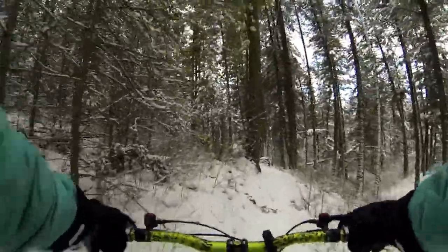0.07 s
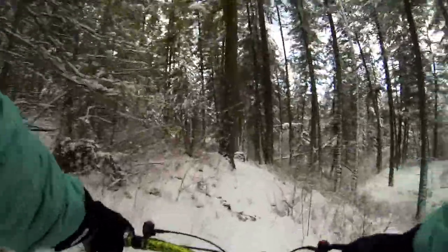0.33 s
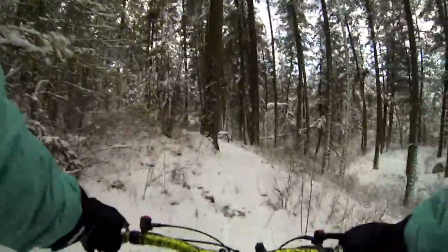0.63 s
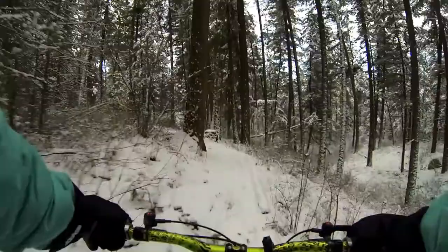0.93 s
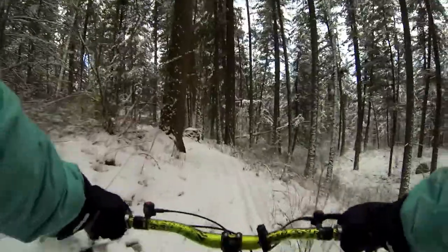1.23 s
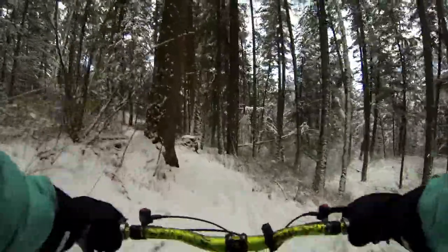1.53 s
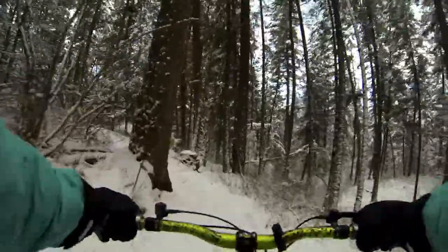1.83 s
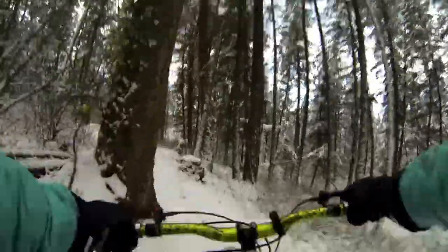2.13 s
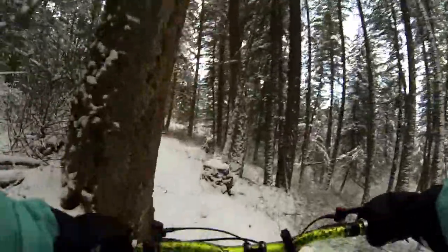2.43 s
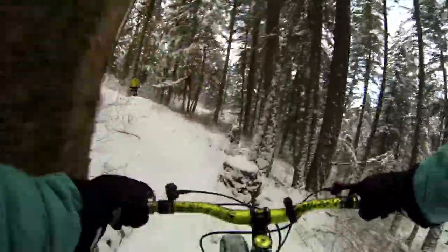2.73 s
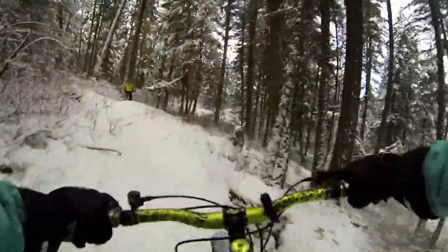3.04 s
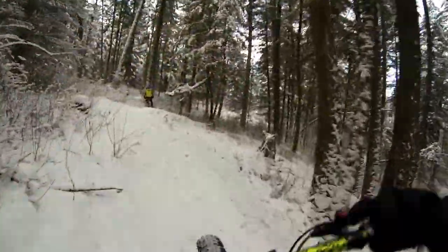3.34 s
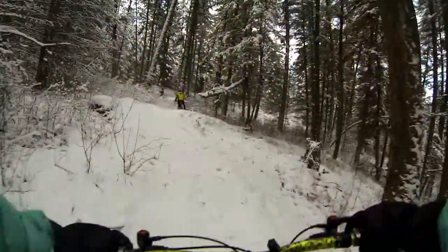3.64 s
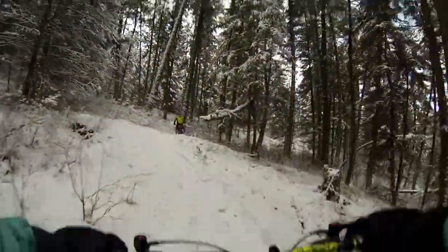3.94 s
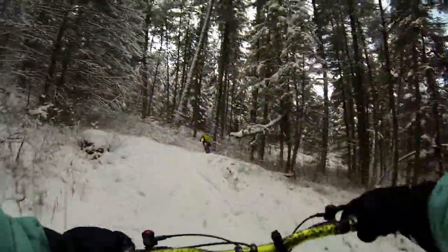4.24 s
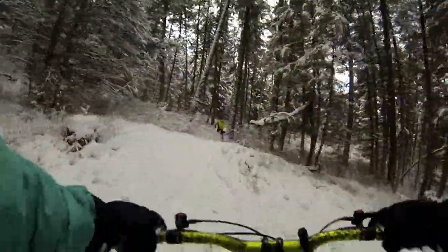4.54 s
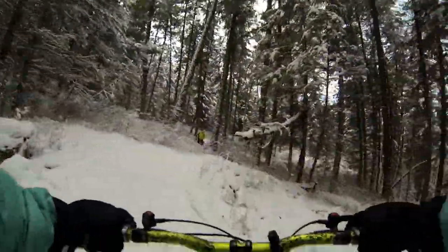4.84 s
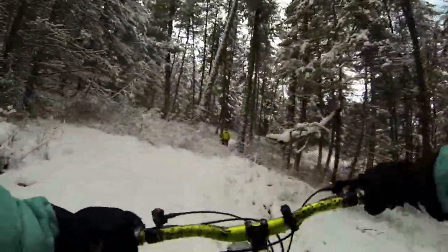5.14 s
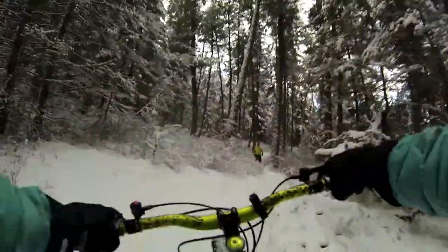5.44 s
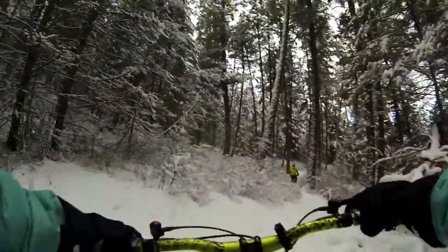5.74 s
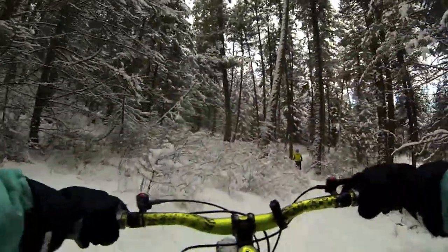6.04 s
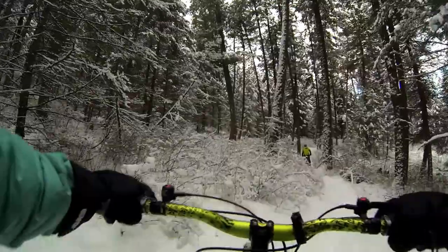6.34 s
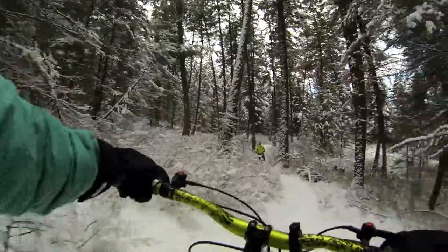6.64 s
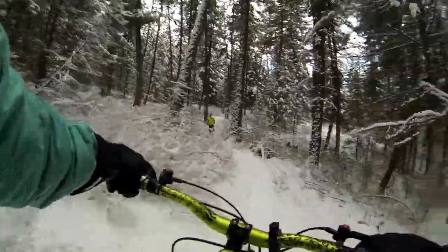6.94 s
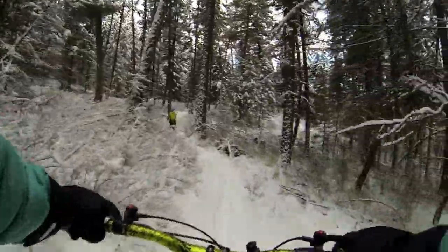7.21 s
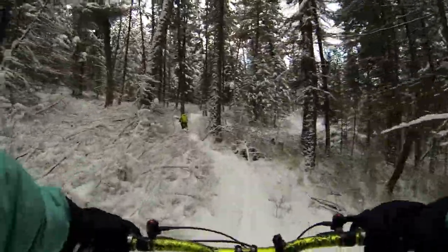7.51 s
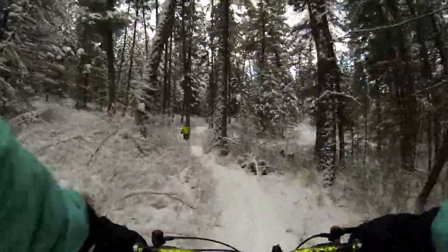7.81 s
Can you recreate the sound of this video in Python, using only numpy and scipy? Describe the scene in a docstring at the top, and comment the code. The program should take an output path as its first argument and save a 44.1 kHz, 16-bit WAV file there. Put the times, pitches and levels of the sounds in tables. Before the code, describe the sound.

Loud, irregular clacks of a knocked camera case and rustling cloth sit over bicycle tyres crunching through snow.

```python
"""A snowy forest trail, heard from a cased camera on the chest of a mountain biker rolling down it.
The tyres crunch and crackle over packed snow, and the rough ground shakes the camera into a rumble.
A warped brake disc brushes its pad and squeaks faintly; near the end loose snow hisses up.
The jacket rubs and creaks on the case, and bumps knock the case in its mount, so hard that
the recorder ducks and clips."""
import sys
import numpy as np
from scipy import signal
from scipy.fft import rfft, irfft, next_fast_len
from scipy.io import wavfile
from scipy.ndimage import uniform_filter1d, minimum_filter1d, map_coordinates

SR = 44100
rng = np.random.default_rng(int(sys.argv[2]) if len(sys.argv) > 2 else 0)


def digitize_waveform(pressure):
    """Quantize a signal to 16-bit integers and store it at the path in sys.argv[1].

    Rows of a 2-D input are taken as channels; values are limited to [-1, 1].
    """
    field = np.atleast_2d(pressure).T
    bounded = np.clip(field, -1, 1)
    quanta = np.round(bounded * 32767).astype(np.int16)
    wavfile.write(sys.argv[1], SR, quanta)


N = 347067

# how hard the tyres work the snow: (time [s], level [dB])
TYRE_EFFORT = [(0.0, -38), (0.4, -41), (0.5, -33), (0.7, -39.5), (0.8, -31.5), (1.15, -38.5), (1.6, -33),
               (1.8, -35.5), (2.4, -35), (2.7, -34.5), (3.0, -33.5), (3.1, -41), (3.25, -35), (3.7, -39.5),
               (3.9, -39.5), (4.7, -39.5), (4.95, -44), (5.4, -37.5), (5.9, -40), (6.35, -34), (6.65, -39),
               (6.8, -40.5), (7.0, -31), (7.28, -32), (7.5, -34), (7.65, -34), (7.86, -41)]
# depth of the snow under the tyres: (time [s], softness [0-1])
SNOW_SOFTNESS = [(0, 0.29), (2.9, 0.19), (3.55, 0.04), (4.2, 0.07), (5.7, 0.16), (6.25, 0.53), (6.7, 0.14),
                 (7.0, 0.48), (7.45, 0.51), (7.87, 0)]
# tone of crunching snow: (frequency [Hz], level [dB])
SNOW_TONE = [(25, -14), (60, -14), (130, -9.5), (300, -11), (580, 0), (950, 2), (1250, -10.5), (2500, -8),
             (4500, -21.5), (7000, -26), (10000, -34.5), (15000, -60)]


def amp(db):
    """Decibels to gain."""
    return 10 ** (np.asarray(db) / 20)


def unit(x):
    """x at rms 1."""
    return x / np.sqrt(np.mean(x ** 2) + 1e-20)


def curves(rows):
    """One value per sample for each column after the time."""
    s, *cols = np.transpose(rows)
    return [np.interp(np.arange(N) / SR, s, c) for c in cols]


def wobble(rate):
    """A smooth random curve, rate knots a second."""
    return map_coordinates(rng.standard_normal(int(N * rate / SR) + 4), [np.arange(N) * rate / SR])


def filtered(x, response):
    """x times a response of frequency."""
    m = next_fast_len(len(x) + 8192)
    return irfft(rfft(x, m) * response(np.fft.rfftfreq(m, 1 / SR)), m)[:len(x)]


def shape(points):
    """Gain as a function of frequency, from (Hz, dB) points."""
    f, db = np.transpose(points)
    return lambda hz: amp(np.interp(np.log(hz + 1), np.log(f), db))


def coloured(x, points):
    """x shaped by a spectrum, at rms 1."""
    return unit(filtered(x, shape(points)))


def sparks(rate, spread_db):
    """Random impulses, rate a second, of uneven size."""
    return (rng.random(N) < rate / SR) * amp(spread_db * np.clip(rng.standard_normal(N), -2, 2))


def add(track, s, sound):
    """Mix a sound into the track from time s."""
    room = track[max(round(s * SR), 0):][:len(sound)]
    room += sound[:len(room)]


def ringing_mode(hz, centre, width):
    """The band-pass response of one resonance."""
    return 1j * hz * width / (centre ** 2 - hz ** 2 + 1j * hz * width)


def swell(s, length):
    """A bell curve of power around time s."""
    return np.exp(-np.minimum((2 * (np.arange(N) / SR - s) / length) ** 2, 50))


def patchy(x, depth_db):
    """x at rms 1, its colour shifting in patches some 300 Hz wide and 10 ms long."""
    spectra = signal.stft(x, nperseg=512, noverlap=384)[2]
    patches = uniform_filter1d(rng.standard_normal(spectra.shape), size=4, axis=0)
    patches = uniform_filter1d(patches, size=4, axis=1)
    spectra *= amp(depth_db * np.clip(unit(patches), -2, 2))
    return unit(signal.istft(spectra, nperseg=512, noverlap=384)[1][:N])


def collapse(pitch_hz):
    """A pocket of snow gives way in a single pressure swing, within 8 ms."""
    phase = np.pi * pitch_hz * (np.arange(round(.008 * SR)) / SR - .004)
    return (1 - 2 * phase ** 2) * np.exp(-phase ** 2)


def crunch(pitch_hz, rate):
    """Snow pockets of three sizes collapse, each size rate times a second, a few much louder."""
    pitches = pitch_hz * 2 ** np.array([-.5, 0, .5])
    layers = [signal.fftconvolve(sparks(rate, spread_db=4), collapse(hz), "same") for hz in pitches]
    return unit(sum(layers))


def tread(rate, scatter, spread_db=3, pitch_hz=430):
    """The knobs bite into soft snow one after another, uneven in time and strength."""
    knobs = np.arange(int(N / SR * rate))
    onsets = (knobs + scatter * rng.standard_normal(len(knobs))) * SR / rate
    strengths = amp(spread_db * np.clip(rng.standard_normal(len(knobs)), -2, 2))
    bites = np.bincount(np.clip(onsets, 0, N - 1).astype(int), strengths, N)
    return unit(signal.fftconvolve(bites, collapse(pitch_hz), "same"))


def tyres(bed_db=-2.5, firm_db=-5, soft_db=-10, tread_db=1.5, uneven_db=2.5):
    """Snow packs under the knobs: a fine crunch where firm, a deep purr where soft, a few big lumps."""
    # lumps of snow collapsing under a tyre: (time [s], peak [dB], pitch [Hz])
    lumps = [(0.297, -17.5, 620), (0.784, -12.5, 564), (0.801, -18, 560), (0.867, -19.5, 523),
             (1.121, -10, 560), (1.5, -18, 566), (1.561, -13, 556), (1.7, -15, 527), (1.712, -12.5, 540),
             (2.556, -17, 564), (2.619, -10.5, 550), (2.811, -18, 517), (2.946, -23, 440),
             (5.675, -17.5, 480), (5.772, -14.5, 506), (6.236, -21, 460), (6.343, -15.5, 464),
             (7.028, -20, 480), (7.059, -15.5, 443), (7.159, -25, 480), (7.191, -18, 440),
             (7.236, -18, 480), (7.393, -15, 460), (7.403, -16, 500), (7.421, -17, 470),
             (7.468, -20.5, 480)]
    softness = np.clip(curves(SNOW_SOFTNESS)[0], 0, 1)
    firmness = np.sqrt(np.maximum(1 - 1.6 * softness, 0))
    bed = coloured(rng.standard_normal(N) * amp(2.66 * wobble(150)), SNOW_TONE)
    grit = amp(bed_db) * bed + amp(firm_db) * crunch(pitch_hz=610, rate=110)
    purr = amp(soft_db) * crunch(pitch_hz=450, rate=97) + amp(tread_db) * tread(rate=90, scatter=0.158)
    effort = amp(curves(TYRE_EFFORT)[0] + uneven_db * wobble(22))
    out = effort * (firmness * grit + softness * purr)
    for s, db, hz in lumps:
        add(out, s, amp(db) * collapse(hz))
    return out


def crackle(trim_db=-15):
    """Crystals snap under the tyres in a fine crackle, mostly where the snow is deep."""
    # tone of snapping crystals: (frequency [Hz], level [dB])
    crystal_tone = [(800, -10), (2500, 5), (4500, 1), (6000, -11), (8000, -15), (10000, -16), (12000, -29),
                    (16000, -38)]
    snaps = sparks(rate=220, spread_db=5.5) * rng.choice([-1, 1], N)
    envelope = curves(SNOW_SOFTNESS)[0] * amp(curves(TYRE_EFFORT)[0] + trim_db)
    return envelope * patchy(coloured(snaps, crystal_tone), depth_db=8)


def rumble(trim_db=-1, uneven_db=2.5):
    """The bumps of the trail reach the camera as a low, uneven rumble."""
    # how hard the trail shakes the camera: (time [s], level [dB])
    shake = [(0, -53), (0.4, -54), (0.9, -51), (1.3, -51.5), (2.4, -54), (3.0, -48.5), (3.45, -49),
             (3.65, -61), (4.1, -58), (4.45, -51.5), (5.3, -50), (5.9, -54), (6.5, -55), (7.86, -58)]
    # tone of the shaking: (frequency [Hz], level [dB])
    shake_tone = [(15, 1.5), (35, -1.5), (80, -3), (140, -9), (300, -27), (1000, -73)]
    envelope = amp(curves(shake)[0] + trim_db + uneven_db * wobble(14))
    return envelope * coloured(rng.standard_normal(N), shake_tone)


def disc_drag(trim_db=-6, sizzle_db=-14, uneven_db=4):
    """The warped disc brushes the pad once a turn and rings unevenly; in between it sizzles faintly."""
    # the front wheel and its dragging brake: (time [s], speed [turns/s], brush level [dB])
    wheel = [(0, 3.2, -73), (1.7, 3.08, -47), (2.7, 3.08, -43.5), (4.0, 3.1, -43.5), (4.95, 2.8, -51),
             (5.5, 3.4, -47), (6.2, 9.1, -51), (7.87, 2.2, -64)]
    # resonances of the brake disc: (frequency [Hz], width [Hz], level [dB])
    disc_modes = [(2170, 35, -4), (3560, 76, -24), (4665, 69, -22), (6300, 140, -33), (7440, 90, -31),
                  (7800, 73, -33), (12200, 150, -41), (13700, 200, -42)]
    warp_turn, brush_turns = 0.24, 0.6  # where in a turn the warp meets the pad, and for how much of it
    speed, brush_db = curves(wheel)
    from_warp = (np.cumsum(speed) / SR - warp_turn + .5) % 1 - .5
    contact = np.exp(-2 * (from_warp / brush_turns) ** 2) + amp(sizzle_db)
    friction, ring = rng.standard_normal(N), np.zeros(N)
    for centre, width, db in disc_modes:
        mode = filtered(friction, lambda hz: ringing_mode(hz, centre, width))
        ring += amp(db + uneven_db * wobble(22)) * mode
    return contact * amp(brush_db + trim_db) * unit(ring)


def case(hz, ring_hz, upper_db=0, wall_db=0, damping=0.62, miss_db_per_hz=0.012):
    """The case's response: an off-centre hit detunes and damps the main mode and misses the wall mode."""
    # resonances of the case, the low wall mode first: (frequency [Hz], width [Hz], level [dB])
    case_modes = [(762, 600, 7.5), (1500, 120, 3), (1700, 203, 16), (2399, 316, 11.5), (2720, 133, 2),
                  (3540, 380, -7), (4540, 720, -8), (7950, 450, -46)]
    (wall_hz, wall_width, wall_level), *higher = case_modes
    main_hz = max(higher, key=lambda mode: mode[2])[0]
    detune = abs(ring_hz - main_hz)
    modes = [(ring_hz, width + damping * detune, db) if centre == main_hz
             else (centre, width, db + upper_db * (centre > main_hz)) for centre, width, db in higher]
    modes.append((wall_hz, wall_width, wall_level + wall_db - miss_db_per_hz * detune))
    return sum(amp(db) * ringing_mode(hz, centre, width) for centre, width, db in modes)


def jacket(rustle_db=-4.5, hiss_db=-4.5, tick_db=-10, fidget_db=2.5, cutoff_hz=2900):
    """Cloth slides over the case: it hisses, tiny catches ring the case and creases tick."""
    # hard strokes of the jacket: (middle [s], length [s], level [dB])
    strokes = [(0.195, 0.036, -20.5), (0.283, 0.037, -27), (0.602, 0.018, -34), (0.756, 0.056, -31.5),
               (0.833, 0.037, -19), (0.915, 0.011, -20.5), (1.23, 0.029, -25), (1.304, 0.021, -30),
               (1.406, 0.017, -19), (1.555, 0.031, -30), (1.742, 0.03, -21), (1.948, 0.012, -20.5),
               (2.146, 0.012, -33), (2.188, 0.018, -26), (2.311, 0.031, -23.5), (2.474, 0.028, -25),
               (2.543, 0.038, -29.5), (2.661, 0.028, -25), (2.767, 0.16, -30), (3.08, 0.029, -25),
               (3.271, 0.029, -28), (3.472, 0.018, -29), (4.152, 0.031, -29.5), (4.27, 0.09, -36.5),
               (4.413, 0.041, -21.5), (4.53, 0.032, -28), (4.609, .024, -36.5), (4.867, 0.043, -35),
               (5.051, 0.024, -34.5), (5.084, 0.019, -26.5), (5.199, 0.033, -36), (5.305, 0.02, -33),
               (5.433, 0.07, -28.5), (5.793, 0.032, -30), (5.984, 0.02, -19), (6.399, 0.018, -25),
               (6.492, 0.023, -24.5), (6.601, 0.011, -29), (6.869, 0.025, -30), (7.498, 0.014, -25.5),
               (7.64, 0.0097, -31)]
    # the rider's constant shifting against the case: (time [s], level [dB])
    shifting = [(0.0, -45), (0.45, -46), (0.5, -29), (0.66, -36), (0.85, -34.5), (1.0, -42.5), (2.5, -35),
                (3.3, -41.5), (3.4, -33.5), (3.65, -43.5), (4.95, -48.5), (5.65, -37), (6.3, -41),
                (6.4, -29), (6.52, -31.5), (6.65, -46.5), (7.43, -43.5), (7.49, -30.5), (7.86, -43)]
    # tone of sliding cloth: (frequency [Hz], level [dB])
    cloth_tone = [(100, -45), (600, -19.5), (1200, -12.5), (1480, 1), (1700, -3), (1950, -2), (2250, -5),
                  (2700, -1), (3150, -14.5), (3700, -14.5), (4300, -23), (5000, -23), (6800, -23),
                  (8000, -25), (9000, -33), (13500, -34.5), (15500, -45)]

    def muffled_case(hz):
        return case(hz, ring_hz=1690, wall_db=-5.5) / (1 + (hz / cutoff_hz) ** 6)

    shift_db = curves(shifting)[0]
    stroke_power = sum(amp(2 * db) * swell(s, length) for s, length, db in strokes)
    rustle = amp(shift_db + rustle_db + fidget_db * wobble(25))
    slips = sparks(rate=500, spread_db=4.5) * rng.choice([-1, 1], N)
    creases = sparks(rate=45, spread_db=4)
    catches = unit(filtered(slips, muffled_case))
    ticks = unit(filtered(creases, muffled_case))
    hiss = coloured(rng.standard_normal(N), cloth_tone)
    rubbing = patchy(catches, depth_db=4.5) + amp(hiss_db) * patchy(hiss, depth_db=4)
    return np.sqrt(stroke_power + rustle ** 2) * rubbing + amp(shift_db + tick_db) * ticks


def knocks(contact_hz=2400, thump_db=-46.5, thump_t60=0.031, wall_db=-9):
    """A blunt hit rings the case and jolts the mount; hard blows are sharp, light ones chatter."""
    # the case hitting its mount: (time [s], peak [dB], ring [Hz], upper modes [dB], low body [dB])
    blows = [(0.0863, 23, 1690, 1, 6), (0.1702, -5.5, 1760, -14, -5), (0.185, 0, 1670, 1, -5),
             (0.2799, -11, 1840, -2, -3), (0.5296, -0.5, 1670, -8, -3), (0.5408, -10, 1620, -16, 5),
             (0.6178, 24, 1700, 2.5, 5.5), (0.8197, -8, 1690, 0, -2), (0.9233, -5.5, 1630, -6, -6),
             (0.939, -3, 1440, 12, 7), (1.1664, 25, 1645, -2.5, 2), (1.1944, -1.5, 1520, -13, 6),
             (1.334, -9.5, 1670, 4, 10), (1.394, -5.5, 1660, -1, -3), (1.418, -10, 1630, 17, -3),
             (1.518, -13, 1700, -6, 2), (1.632, 17, 1647, 0.5, 10), (1.7468, -1, 1610, 0, 5),
             (1.9507, -0.5, 1570, 9.5, 0), (2.152, 24.5, 1665, -0.5, 4.5), (2.2384, -12, 1690, -17, -7),
             (2.321, -15, 1720, 10, -2), (2.446, -18, 1660, -16, -5), (2.53, -13, 1710, -16, 0),
             (2.5737, 14, 1690, 1.5, 3), (2.855, 16, 1894, -1.5, -4), (3.0812, 19, 1690, -2.5, 4),
             (3.108, -10.5, 1680, 4, -3), (3.379, 0, 1690, -7, -9), (3.428, -14, 1780, 15, 0),
             (4.154, -9, 1480, -14, 5), (4.35, 15, 1710, 2, 3.5), (4.389, -5, 1570, -9, -4),
             (4.414, -4.5, 1610, 4, 0), (4.6478, -14.5, 1610, -21, 0), (4.7165, -16, 1680, 0, 3),
             (5.088, -5, 1640, -26, 3), (5.224, 19.5, 1690, 6.5, -4), (5.2369, 9, 1700, 5.5, -9),
             (5.3796, -17, 1630, 3, 0), (5.4302, -7.5, 1690, -2, -2), (5.5433, -13, 1670, 0, 0),
             (5.801, 12, 1649, -4.5, 0), (5.8315, -3.5, 1690, 4, -11), (5.983, 1.5, 1710, 5, -3),
             (5.991, -6, 1700, 7, -5), (6.001, 8.5, 1700, 6, -1.5), (6.042, -7.5, 1610, 0, 16),
             (6.0673, 25, 2038, 1.5, -2.5), (6.282, 20, 1690, 3.5, 0.5), (6.513, -7.5, 1580, 4, 9),
             (6.521, -11, 1650, 5, -3), (6.738, 25, 1690, 0.5, 6.5), (6.775, -17, 1670, -16, 2),
             (6.8747, 4.5, 1500, 4, -9), (7.3038, 24, 1664, 0.5, 4.5), (7.358, -8, 1650, 3, -6),
             (7.4828, -13, 1680, -4, -2), (7.5325, -4.5, 1690, 7, -5), (7.578, -0.5, 1730, 0, -3),
             (7.6475, 1, 1770, -3, -8), (7.6493, 1, 1910, -10, -10), (7.688, -19, 1700, 4, 0),
             (7.74, -17, 1830, 14, -6)]
    firm_chatter, loose_chatter, chatter_t60 = .022, .055, .009
    out, t = np.zeros(N), np.arange(2048) / SR
    for s, db, ring_hz, upper_db, body_db in blows:
        looseness = np.clip(2 - db / 8, 0, 1)  # fully loose up to 8 dB, firm from 16 dB
        chatter = firm_chatter + looseness * loose_chatter
        force = chatter * rng.standard_normal(len(t)) * amp(-60 * t / chatter_t60)
        force[0] = 1  # the hit itself
        cutoff_hz = min(contact_hz * 2 ** (db / 60), SR / 4)  # harder is brighter
        force = signal.lfilter(*signal.butter(2, cutoff_hz, fs=SR), force)
        ring = filtered(force, lambda hz: case(hz, ring_hz, upper_db, wall_db + body_db))
        jolt = amp(thump_db + body_db - 60 * t / thump_t60)
        add(out, s, amp(db) * (ring / np.abs(ring).max() + jolt))
    return out


def creaks(scatter_hz=170):
    """Where the jacket grips the case, its slips fall into step: a rough, gliding squeak."""
    # stick-slip squeaks: (middle [s], length [s], pitch [Hz], glide [octaves/s], level [dB])
    grips = [(0.488, 0.016, 1850, -5, -31.5), (0.504, 0.0079, 1990, 8, -32), (0.524, 0.0097, 2565, -6, -26),
             (0.572, 0.0061, 1560, 0, -32), (0.602, .012, 2010, 0, -24), (0.596, 0.011, 2520, -7, -29),
             (0.676, 0.0021, 1905, 0, -11), (0.922, 0.0066, 1630, 0, -20), (4.435, 0.0067, 1665, -1, -16),
             (4.541, 0.021, 1950, 4.5, -27), (4.609, .009, 1970, 0, -30.5), (5.417, .016, 1733, 7, -29),
             (5.581, 0.014, 1640, 0, -27), (5.778, .018, 2550, 6, -32), (5.793, .012, 1910, -5, -31),
             (6.4, 0.0031, 1920, 0.5, -11), (6.712, .012, 2010, 0, -35)]
    out, t = np.zeros(N), np.arange(-2205, 2205) / SR
    for s, length, hz, glide, db in grips:
        jitter = unit(uniform_filter1d(rng.standard_normal(len(t)), size=60))
        phase = 2 * np.pi * np.cumsum(hz * 2 ** (glide * t) + scatter_hz * jitter) / SR
        envelope = amp(db) * np.sqrt(2) * np.exp(-2 * (t / length) ** 2)
        add(out, s + t[0], envelope * np.sin(phase))
    return out


def brake_squeaks(trim_db=-2, drift_hz=48, flutter_db=3.5):
    """Each grab of the pad sets one mode of the disc squeaking with a rough flutter."""
    # grabs of the pad: (middle [s], length [s], pitch [Hz], level [dB])
    grabs = [(1.545, 0.05, 5570, -47), (1.568, 0.016, 2170, -32), (2.1, 0.032, 4665, -50),
             (2.098, .03, 7980, -55), (2.105, 0.018, 2200, -43), (2.181, 0.019, 2180, -27),
             (2.375, 0.012, 2140, -32), (2.65, 0.055, 8100, -45), (2.767, 0.013, 2170, -29),
             (3.003, 0.024, 2170, -32), (3.29, 0.032, 7980, -51), (3.358, 0.013, 2165, -24),
             (3.54, 0.019, 2170, -32.5), (3.585, .01, 2170, -38), (3.592, 0.021, 4665, -42),
             (3.615, 0.0075, 2160, -34), (3.651, 0.0096, 2130, -32.5), (3.925, 0.029, 2133, -36),
             (3.955, 0.02, 7980, -50), (3.963, 0.028, 4665, -54), (4.052, .018, 2170, -39),
             (4.097, 0.012, 2170, -37), (4.48, 0.027, 2170, -42), (4.558, 0.0062, 2015, -27),
             (4.633, .012, 2170, -35), (4.64, 0.024, 7980, -57), (5.343, 0.023, 2170, -35),
             (5.515, 0.032, 2135, -30), (5.654, 0.021, 2160, -29.5), (5.682, 0.012, 2180, -30)]
    t = np.arange(N) / SR
    drift = drift_hz * np.cumsum(wobble(220)) / SR
    song = sum(amp(db) * np.sqrt(2 * swell(s, length)) * np.sin(2 * np.pi * (hz * t + drift))
               for s, length, hz, db in grabs)
    return song * amp(trim_db + flutter_db * wobble(110))


def crust():
    """A patch of crust gives way in a flurry of small collapses."""
    # breaking patches: (middle [s], length [s], level [dB])
    breaks = [(2.019, 0.027, -29.5), (2.825, .028, -32), (2.994, 0.06, -32.5), (3.172, 0.0087, -26.5),
              (3.207, 0.018, -31.5)]
    power = sum(amp(2 * db) * swell(s, length) for s, length, db in breaks)
    return np.sqrt(power) * coloured(crunch(pitch_hz=735, rate=250), SNOW_TONE)


def crumbs(t60=0.03):
    """Crumbs of snow thrown by the tyre tick against the bike."""
    # crumbs landing: (time [s], level [dB])
    hits = [(3.231, -39), (3.355, -44), (3.407, -41), (3.469, -37), (3.547, -43), (6.165, -45),
            (6.196, -42), (6.94, -48), (7.028, -44), (7.2, -49), (7.225, -47)]
    # tone of a tick: (frequency [Hz], level [dB])
    tick_tone = [(2000, -15), (5500, 0), (7500, 6), (10500, -5), (14000, -5), (16000, -20)]
    envelope, t = np.zeros(N), np.arange(SR // 10) / SR
    for s, db in hits:
        add(envelope, s, amp(db - 60 * t / t60))
    return envelope * coloured(rng.standard_normal(N), tick_tone)


def spray(start_s=7.49, hold_s=0.24, level_db=-40.5, crest_db=4.5, clump_db=0.5):
    """Loose snow flies up from the tyre in one gritty burst that rises, crests and falls."""
    # tone of the gritty hiss, with a dip near 11 kHz: (frequency [Hz], level [dB])
    hiss_tone = [(500, -4), (1600, -3), (3600, 0), (4900, 5), (5700, -2), (6300, 3), (7100, -1.5),
                 (8000, -2), (8800, 0), (10200, -4.5), (10900, -21), (12500, -17), (14300, -11),
                 (16000, -32)]
    rise_s, fall_s = 0.066, 0.1  # times for 20 dB, before and after the hold
    grains = sparks(rate=1300, spread_db=3) * rng.choice([-1, 1], N)
    t = np.arange(N) / SR - start_s
    arch = np.sin(np.pi * np.clip(t / hold_s, 0, 1)) ** 2
    fade_db = 20 * np.maximum(0, np.maximum(-t / rise_s, (t - hold_s) / fall_s))
    envelope = amp(level_db + crest_db * arch - fade_db + clump_db * wobble(70))
    return envelope * patchy(coloured(grains, hiss_tone), depth_db=3.5)


def scene():
    """Everything is close and heard through the case; the snow gives no echo."""
    # thin high resonances of the case, colouring everything: (frequency [Hz], gain [dB])
    sheen = [(3000, 0), (5000, -1), (7400, -3), (7950, 1), (8600, -4), (9900, 3), (11000, -2), (12200, 5),
             (14000, 10)]
    camera = knocks() + jacket() + creaks() + rumble()
    snow = tyres() + crust() + crackle() + spray() + crumbs()
    return filtered(camera + snow + brake_squeaks() + disc_drag(), shape(sheen))[None]


def duck(x, threshold_db=-3, slope=0.34, depth_db=10, hold_s=0.032, release_s=0.016):
    """Gain control: a peak pulls the gain down within a few ms; it holds, then recovers."""
    over_db = 20 * np.log10(np.abs(x) + 1e-9) - threshold_db
    wanted_db = np.clip(slope * over_db, 0, depth_db)
    span = int(hold_s * SR) // 2 * 2 + 1
    held_db = -minimum_filter1d(-wanted_db, span, origin=span // 2)
    age = np.arange(N) / (release_s * SR)
    cut_db = np.exp(np.maximum.accumulate(np.log(held_db + 1e-9) + age) - age)  # exponential release
    attack = np.hanning(round(.007 * SR))
    return x * amp(-signal.fftconvolve(cut_db, attack / attack.sum())[:N])


def limit(x, ceiling_db=7):
    """A fast limiter flattens the attack of a hard knock, not enough to stop it clipping."""
    peak = uniform_filter1d(-minimum_filter1d(-np.abs(x), size=31), size=21)
    return x / np.maximum(1, peak / amp(ceiling_db))


def record(dry, hardness=4, top_hz=15800):
    """The camera ducks and limits on knocks, saturates, dulls the treble, clips and cuts the very top."""
    # treble loss of the recorder: (frequency [Hz], gain [dB])
    treble_loss = [(2000, 2), (3600, 1), (5000, -2.5), (6000, -5.5), (8000, -7), (10500, -3.5),
                   (14000, -20), (15200, -24), (16000, -38)]
    limited = limit(duck(dry[0]))
    saturated = limited / (1 + np.abs(limited) ** hardness) ** (1 / hardness)
    clipped = np.clip(filtered(saturated, shape(treble_loss)), -.985, .985)
    return filtered(clipped, lambda hz: 1 / (1 + (hz / top_hz) ** 60))[None]


dry = scene()
out = record(dry)
digitize_waveform(out)
```